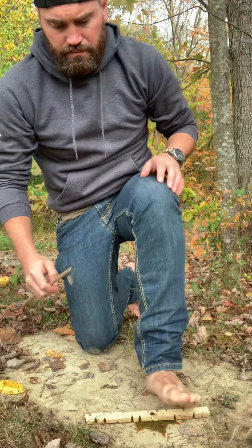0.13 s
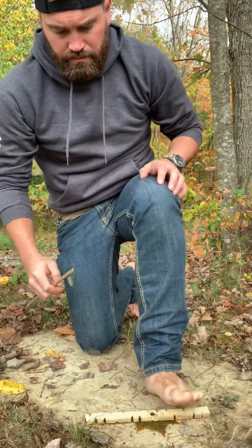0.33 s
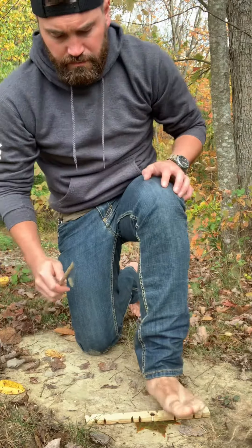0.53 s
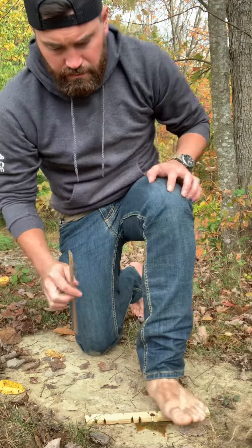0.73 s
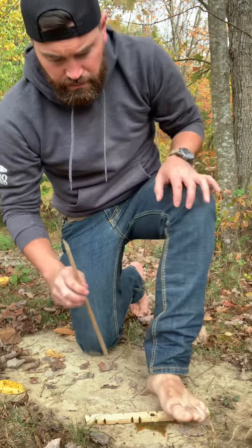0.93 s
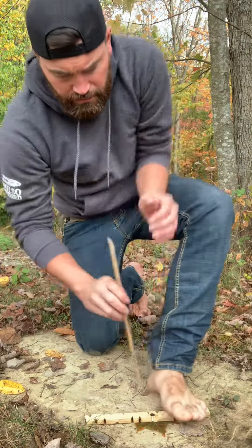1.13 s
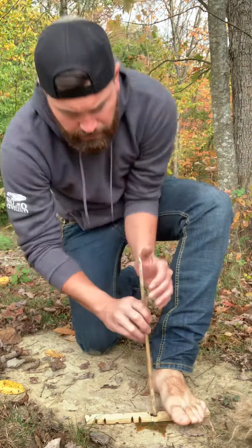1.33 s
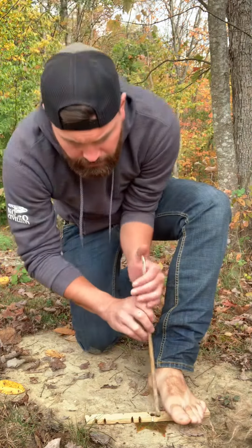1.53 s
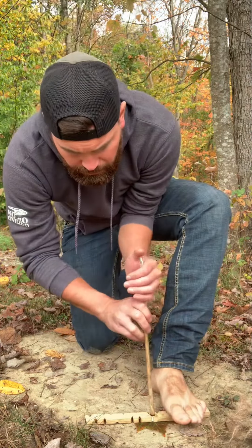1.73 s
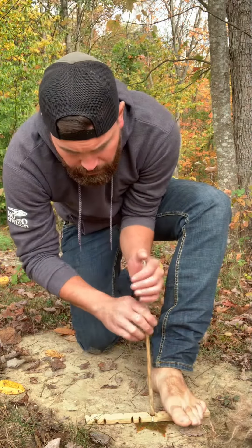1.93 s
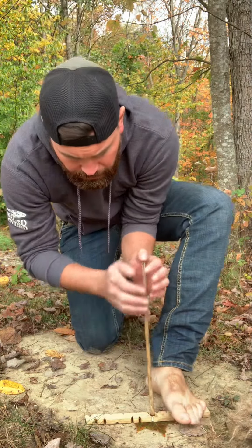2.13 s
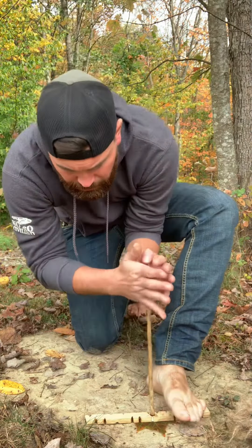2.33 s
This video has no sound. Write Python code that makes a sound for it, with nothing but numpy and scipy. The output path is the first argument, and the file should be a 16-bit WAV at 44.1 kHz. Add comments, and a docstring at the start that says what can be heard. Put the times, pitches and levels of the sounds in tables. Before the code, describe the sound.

Far motor drone and soft leaf hiss outdoors, faint dry clicks of a thin stick close by

```python
"""Quiet wood with far motors

A far steady engine drones as locked sine orders plus noise and slowly dulls; a second motor hums and wavers.
Close by, someone sets a thin stick on a board: tiny dry ticks as short decaying sines.
Brushes of cloth and skin, palms starting to rub, are grainy noise; leaves hiss as patchy noise in light air.
A low sine rumbles in lumps and a little low noise is wind. Two close microphone ports twist the treble phase."""
import sys
import numpy as np
from scipy import signal
from scipy.fft import rfft, irfft, next_fast_len
from scipy.io import wavfile
from scipy.ndimage import uniform_filter1d

SR = 44100
rng = np.random.default_rng(int(sys.argv[2]) if len(sys.argv) > 2 else 0)


def digitize_waveform(pressure):
    """Quantize a signal to 16-bit integers and store it at the path in sys.argv[1].

    Rows of a 2-D input are taken as channels; values are limited to [-1, 1].
    """
    field = np.atleast_2d(pressure).T
    bounded = np.clip(field, -1, 1)
    quanta = np.round(bounded * 32767).astype(np.int16)
    wavfile.write(sys.argv[1], SR, quanta)


def level_to_linear(level):
    """Convert decibel levels to linear amplitude factors, elementwise."""
    exponent = np.asarray(level, float) / 20
    return 10 ** exponent


N = 110250


def evened(x):
    """Scale to an rms of one."""
    return x / np.sqrt(np.mean(x ** 2) + 1e-20)


def read(points, hz):
    """Interpolate a table over log frequency."""
    f, value = np.transpose(points)
    return np.interp(np.log(hz + 1), np.log(f + 1), value)


def curve(table, index=1):
    """One column of a time table at every sample."""
    table = np.array(table)
    return np.interp(np.arange(N) / SR, table[:, 0], table[:, index])


def drift(top_hz):
    """Slow random wander, rms one: 16 sines up to top_hz, the slower ones stronger."""
    t = np.arange(0, N + 200, 100) / SR
    y = 0
    for f in np.geomspace(top_hz / 20, top_hz, num=16):
        y = y + np.sin(2 * np.pi * (f * t + rng.random())) / np.sqrt(f)
    return np.interp(np.arange(N) / SR, t, evened(y))


# left-right likeness of noise ahead of the ports: frequency_hz, likeness (0-1)
LIKENESS = [(100, 0.97), (300, 0.85), (500, 0.73), (1000, 0.45), (2200, 0.64), (3100, 0.56), (3700, 0.22),
            (5000, 0.56), (5700, 0.17), (7000, 0.75), (8200, 0.77), (8700, 0.96), (11200, 0.92),
            (11900, 0.26), (13000, 1), (13800, 0.95), (15500, .98)]


def noise(field_db, patchy_db):
    """Two-channel noise, rms one: random short-time spectra shaped by field_db(hz, s) and random patches."""
    frames, hz = N // 256 + 5, np.fft.rfftfreq(1024, 1 / SR)[:, None]
    a, b, c, d, broad, narrow = rng.standard_normal((frames, 513, 6)).T
    broad = evened(uniform_filter1d(uniform_filter1d(broad, size=12, axis=0), size=7, axis=1))
    narrow = evened(uniform_filter1d(uniform_filter1d(narrow, size=3, axis=0), size=7, axis=1))
    patches = broad + .9 * narrow
    same = np.clip(read(LIKENESS, hz), 0, 1)
    left = a + 1j * b
    right = same * left + np.sqrt(1 - same ** 2) * (c + 1j * d)
    gain = level_to_linear(field_db(hz, np.arange(frames) * 256 / SR) + patchy_db * patches)
    spectra = np.array([left, right]) * gain
    return evened(signal.istft(spectra, nperseg=1024, noverlap=768)[1][:, :N])


# engine orders at the start: order (multiple of the cycle), level_db (rms)
ENGINE_ORDERS = [(3, -80), (4, -64.5), (8, -62), (10, -71.5), (11, -65), (12, -47.5), (13, -71),
                 (14, -69.5), (15, -78.5), (16, -53), (17, -74), (18, -63.5), (19, -74), (20, -66.5),
                 (22, -78), (24, -62.5), (25, -71.5), (26, -65), (28, -68.5), (38, -70.5), (39, -74),
                 (40, -72.5)]
CYCLE_HZ, FIRST_BEAT_S = 16.005, .02918
TIGHT_TURNS, LOOSE_TURNS = .06, .25  # phase scatter about the beat, rms
# fade after 1 s is per order above FADE_FROM_ORDER, limited to FADE_LIMIT_DB, then grows as t ** FADE_POWER
FADE_FROM_ORDER, FADE_DB_PER_ORDER, FADE_LIMIT_DB, FADE_POWER = 11.7, -0.4522, -5, 1.49
SHIMMER_DB = .6  # the air makes each order waver


def engine_orders():
    """Multiples of the engine cycle meet in one beat per cycle; the upper ones fade ever faster."""
    t = np.arange(N) / SR
    out = np.zeros(N)
    for order, level_db in ENGINE_ORDERS:
        fade_db = max(FADE_DB_PER_ORDER * max(order - FADE_FROM_ORDER, 0), FADE_LIMIT_DB)
        gain = level_to_linear(level_db + fade_db * t ** FADE_POWER + SHIMMER_DB * drift(7.18))
        # low multiples of four keep closest to the beat
        scatter = LOOSE_TURNS if order % 4 or order > 17 else TIGHT_TURNS
        turns = order * CYCLE_HZ * (t - FIRST_BEAT_S) + scatter * rng.standard_normal()
        out += np.sqrt(2) * gain * np.cos(2 * np.pi * turns)
    return out


# exhaust noise spectrum: frequency_hz, density_db (relative, per Hz)
ROAR_SPECTRUM = [(30, -29), (60, -11), (85, -6), (120, -3), (155, -8), (200, -4.5), (260, -4), (350, -12),
                 (450, -16), (600, -35)]
ROAR_DB, ROAR_FADE_DB_PER_S, ROAR_FADE_ABOVE_HZ = -54.5, -3, 230


def exhaust_roar():
    """Low exhaust noise whose upper part fades steadily."""
    def field_db(hz, s):
        fade_db = ROAR_FADE_DB_PER_S * s * (hz > ROAR_FADE_ABOVE_HZ)
        return read(ROAR_SPECTRUM + [(1200, -86)], hz) + fade_db
    return level_to_linear(ROAR_DB) * noise(field_db, patchy_db=1.5)


# second motor, before its waver: time_s, pitch_hz, level_db (rms), octave_level_db (rms)
MOTOR_HUM = [(0, 100.4, -52, -55), (.15, 100.5, -50, -55), (.33, 100.5, -52, -72), (.63, 100.9, -54.5, -58),
             (.8, 100.4, -49.5, -66), (1.15, 100.7, -56.5, -59), (1.4, 100.8, -59, -55),
             (1.75, 100.2, -64, -55.5), (1.9, 99.7, -51.5, -64), (2.15, 100.2, -55, -62),
             (2.3, 100.2, -51, -69), (2.5, 100.2, -53, -68)]


def motor():
    """A hum and its octave, both wavering in level and phase."""
    phase = 2 * np.pi * np.cumsum(curve(MOTOR_HUM)) / SR
    octave_gain = level_to_linear(curve(MOTOR_HUM, index=3) + 2.5 * drift(5.8))
    octave = octave_gain * np.sin(2 * phase + 0.46 * drift(5.1))
    hum_gain = level_to_linear(curve(MOTOR_HUM, index=2) + 2.6 * drift(18))
    hum = hum_gain * np.sin(phase + 0.4 * drift(12))
    return np.sqrt(2) * (hum + octave)


# dry ticks of stick and leaf litter: start_s, envelope_peak_db, pitch_hz, length_cycles
DRY_TICKS = [(.5013, -52, 12500, 3), (1.1028, -43, 13500, 4), (1.1031, -44, 10500, 3),
             (1.1033, -44, 7200, 3), (1.2146, -44, 5300, 4), (1.349, -54, 11500, 4),
             (1.4235, -48, 10800, 5), (1.4272, -47, 10800, 4), (1.438, -47, 7500, 3),
             (1.4915, -48, 8500, 3), (1.5500, -46, 6800, 2), (1.5535, -48, 11000, 1.8),
             (1.6400, -48, 14000, 3), (1.6725, -47, 14000, 3), (1.6735, -49, 10000, 4),
             (2.1830, -53, 14000, 3), (2.2250, -53, 14500, 4), (2.2423, -39, 12500, 1.3),
             (2.2424, -46, 5200, 2.2), (2.2428, -50, 14000, 5), (2.2600, -54, 5000, 3)]


def ticks():
    """Each tick is a sine under an envelope that peaks after half its length_cycles, then dies fast."""
    out = np.zeros(N + SR)
    t = np.arange(300) / SR
    for start_s, peak_db, pitch_hz, cycles in DRY_TICKS:
        u = 2 * t * pitch_hz / max(cycles, .5)
        envelope = np.e * u * np.exp(-u)
        at = round(start_s * SR)
        out[at:at + len(t)] += level_to_linear(peak_db) * envelope * np.sin(2 * np.pi * pitch_hz * t)
    return out[:N]


# brushes of cloth and skin: peak_s, rise_s, fall_s, level_db (rms at the peak)
BRUSH_STROKES = [(.5, .02, .03, -74), (1.0, .04, .05, -76), (1.305, .02, .02, -72),
                 (1.435, .045, .015, -62), (1.548, .008, .016, -61), (1.675, .012, .015, -67),
                 (2.46, .022, .02, -63), (2.497, .02, .03, -59.5)]
# friction hiss spectrum: frequency_hz, density_db (relative, per Hz)
BRUSH_SPECTRUM = [(1500, -25), (4000, -4), (7000, 0), (10000, -1), (13000, 0), (16000, 0), (17000, -40)]
GRAINS_PER_S, GRAIN_SPREAD_DB, GRAIN_DECAY_S, GRAIN_SHARE = 1000, 4, .0007, .62


def brushes():
    """Bright friction hiss, broken into random slips, under a rise and fall for each brush."""
    t = np.arange(N) / SR
    shape = np.zeros(N)
    for peak_s, rise_s, fall_s, level_db in BRUSH_STROKES:
        width_s = np.where(t < peak_s, rise_s, fall_s)
        shape += level_to_linear(level_db) * np.exp(-((t - peak_s) / width_s) ** 2)
    slip_places = rng.random(N) < GRAINS_PER_S / SR
    slips = slip_places * level_to_linear(GRAIN_SPREAD_DB * np.minimum(rng.exponential(size=N), 3))
    grains = evened(np.convolve(slips, np.exp(-t[:200] / GRAIN_DECAY_S))[:N])
    grain = 1 - GRAIN_SHARE + GRAIN_SHARE * grains
    hiss = noise(lambda hz, s: read(BRUSH_SPECTRUM, hz), patchy_db=1.5)
    return shape * evened(grain * hiss)


# lumpy low rumble: time_s, level_db (rms)
RUMBLE_LEVEL = [(0, -60), (.03, -53), (.12, -67), (.16, -54), (.34, -55), (.38, -64), (.56, -52),
                (.61, -68), (.67, -53), (.92, -66), (.95, -54), (1.03, -63), (1.4, -60), (1.5, -52),
                (1.58, -55), (1.74, -51), (1.85, -62), (2.03, -67), (2.07, -50), (2.16, -70), (2.25, -54),
                (2.5, -61)]
RUMBLE_HZ, RUMBLE_WANDER_HZ = 63, 9


def rumble():
    """A low sine with wandering pitch and lumpy level."""
    pitch_hz = RUMBLE_HZ + RUMBLE_WANDER_HZ * drift(30)
    turns = np.cumsum(pitch_hz) / SR + rng.random()
    return level_to_linear(curve(RUMBLE_LEVEL)) * np.sqrt(2) * np.sin(2 * np.pi * turns)


# hiss of leaves and distance: frequency_hz, density_db (relative, per Hz)
LEAF_SPECTRUM = [(150, -7), (400, -0.5), (700, 0), (1200, -2.5), (2200, -3.5), (3100, -7), (4200, -8),
                 (5000, -11.5), (6500, -15), (8300, -16), (10800, -19), (11700, -21.5), (15500, -24.5)]
LEAVES_DB, RUSTLES_PER_S, RUSTLE_DB, RUSTLE_DECAY_S = -52, 20, .5, .02


def leaves():
    """Steady patchy hiss with small stirs that start at once and die away."""
    starts = (rng.random(N) < RUSTLES_PER_S / SR) * rng.exponential(size=N)
    stirs = signal.lfilter([1], [1, -np.exp(-1 / (RUSTLE_DECAY_S * SR))], starts)
    level_db = LEAVES_DB + 0.15 * drift(5) + RUSTLE_DB * evened(stirs - stirs.mean())
    return level_to_linear(level_db) * noise(lambda hz, s: read([(40, -44)] + LEAF_SPECTRUM, hz), patchy_db=1.3)


# wind on each port: time_s, level_db (rms)
WIND_LEVEL = [(0, -86), (.15, -82), (.3, -70), (.45, -77), (.62, -69), (.85, -82), (1.0, -77), (1.3, -90),
              (1.6, -82), (2.05, -74), (2.25, -86), (2.5, -86)]
WIND_HZ, WIND_WIDTH_HZ = 56, 21


def wind():
    """Independent noise on each port in one low, bell-shaped band."""
    hz = np.fft.rfftfreq(N, 1 / SR)
    bell = np.exp(-.5 * ((hz - WIND_HZ) / WIND_WIDTH_HZ) ** 2)
    air = irfft(rfft(rng.standard_normal((2, N))) * bell, N)
    return level_to_linear(curve(WIND_LEVEL)) * evened(air)


# level difference of the ports: frequency_hz, left_minus_right_db
BALANCE = [(60, 0.5), (120, 0.8), (190, 2.1), (260, 2), (500, 0.5), (700, -0.8), (1100, 0), (2400, 0.9),
           (3500, -0.5), (15000, 1)]


def ports(x, phase):
    """Phase and balance of two close microphone ports, split equally between left and right."""
    size = next_fast_len(N + 4096)
    hz = np.fft.rfftfreq(size, 1 / SR)
    half = np.exp(.5j * read(phase, hz)) * level_to_linear(read(BALANCE, hz) / 2)
    return irfft(rfft(x, size) * np.array([half, 1 / half]), size)[:, :N]


# port phase of far sound: frequency_hz, left_lead_rad
FAR_LEAD = [(30, .25), (100, -0.27), (190, 0.05), (260, 0.2), (430, -1), (690, -1.34), (1120, -1),
            (2070, -1.57), (3100, -3), (3960, -1.7), (5000, -3), (6300, -1.24), (7400, -2), (8500, -3),
            (11200, -3), (11800, -3.5), (12600, -4), (13500, -6), (15500, -7)]
# port phase of sound from the hands: frequency_hz, left_lead_rad
HANDS_LEAD = [(1000, -.2), (5300, -.9), (7500, -1.9), (8600, -3), (11000, -3.3), (12500, -4.9),
              (13800, -6.1), (15500, -6.28)]


def scene():
    """All sources as the two ports receive them."""
    far = leaves() + rumble() + wind() + engine_orders() + exhaust_roar() + motor()
    hands = ticks() + brushes()
    return ports(far, FAR_LEAD) + ports(hands, HANDS_LEAD)


def band_limit(x):
    """A steep low-pass at the top of the band."""
    return signal.sosfilt(signal.butter(12, 15950, fs=SR, output="sos"), x)


def record(dry):
    """The finished mix as delivered."""
    return band_limit(dry)


dry = scene()
out = record(dry)
digitize_waveform(out)
```